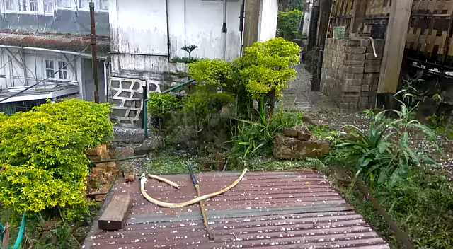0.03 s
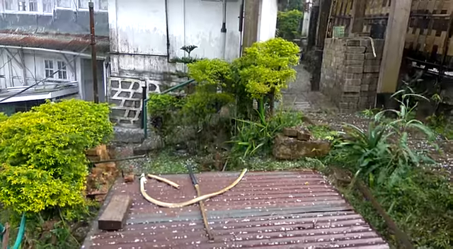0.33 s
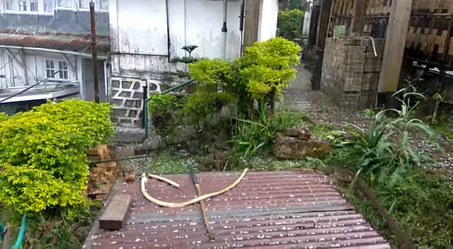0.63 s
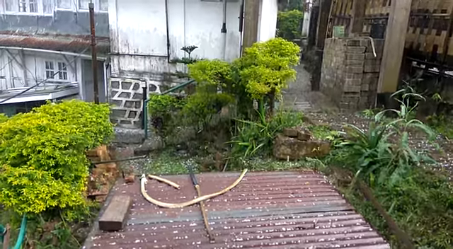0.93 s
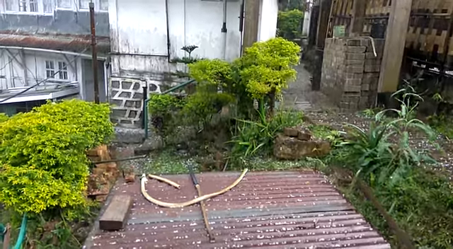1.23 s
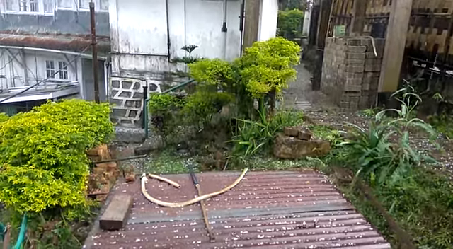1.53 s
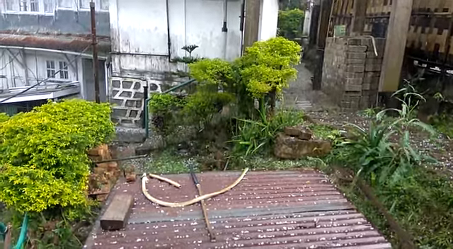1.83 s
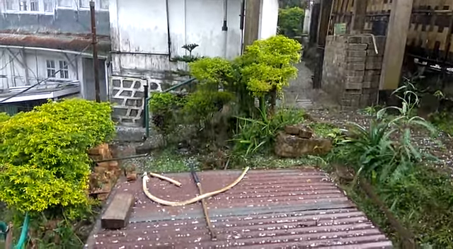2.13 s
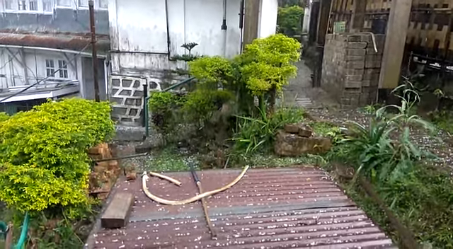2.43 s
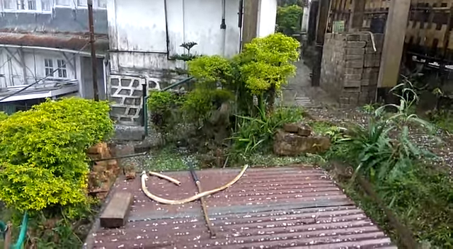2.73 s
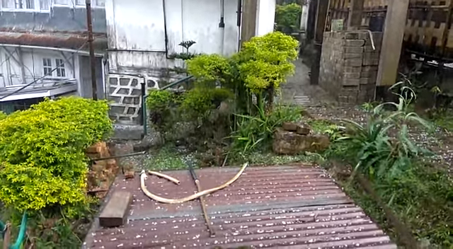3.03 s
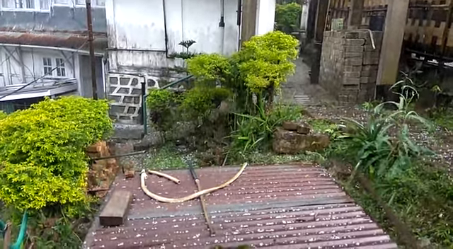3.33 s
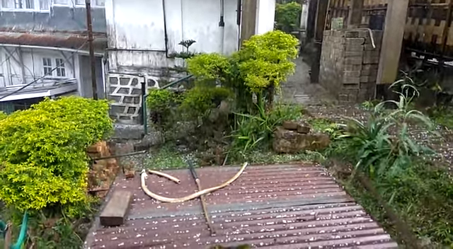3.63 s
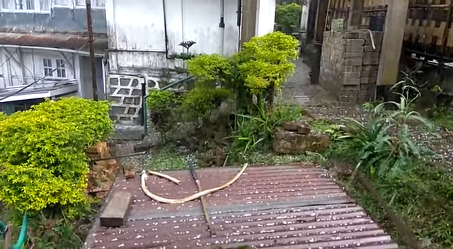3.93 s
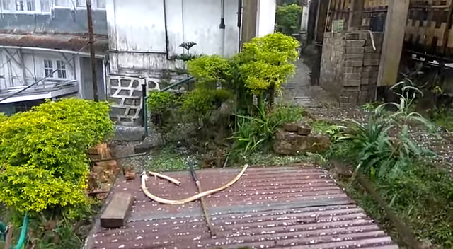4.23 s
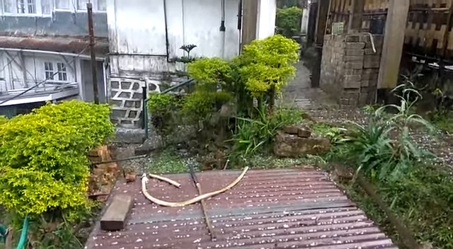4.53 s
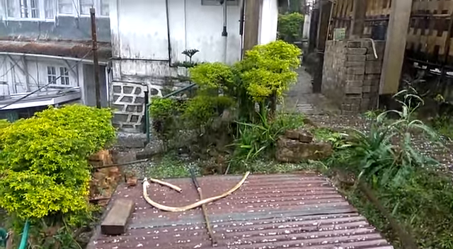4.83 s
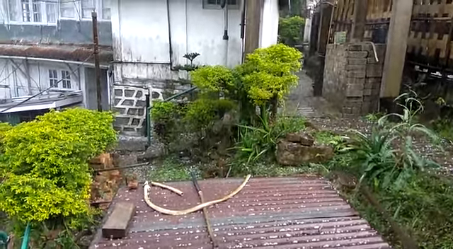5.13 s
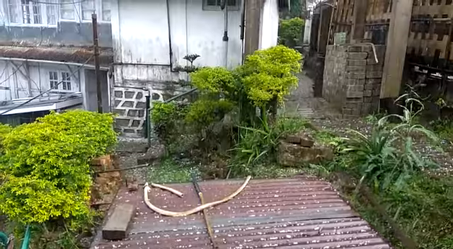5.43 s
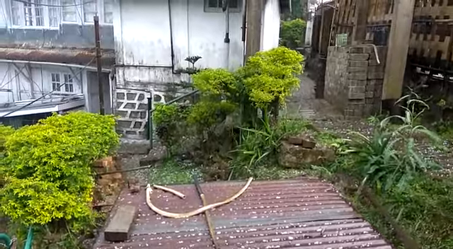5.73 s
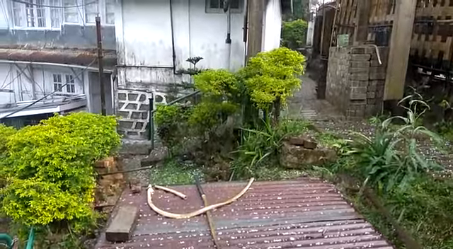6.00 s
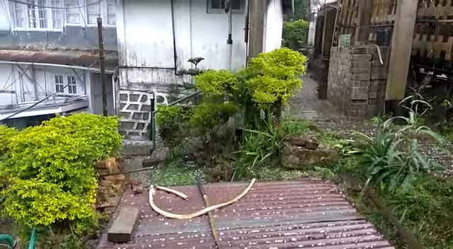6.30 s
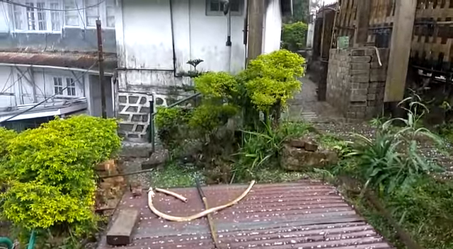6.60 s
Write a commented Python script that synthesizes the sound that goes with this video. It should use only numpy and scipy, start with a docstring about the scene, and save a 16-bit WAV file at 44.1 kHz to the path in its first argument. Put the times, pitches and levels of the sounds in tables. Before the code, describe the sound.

Hailstones and rain drum and rattle on metal roofing in a yard, with sharp close hits and occasional heavier knocks.

```python
"""After a brief silence, hail and rain fade in, beating steadily on corrugated metal roofing in a yard.
Countless impacts excite the modes of the sheets and merge into drumming and a bright rattle of ice.
Almost at once nearer stones begin to crack and skitter on the metal; then a few heavy ones thud.
The fall keeps on to the end, and its loudest peaks overload the microphone."""
import sys
import numpy as np
from scipy import signal
from scipy.fft import rfft, irfft, next_fast_len
from scipy.io import wavfile
from scipy.ndimage import map_coordinates

SR = 44100
rng = np.random.default_rng(int(sys.argv[2]) if len(sys.argv) > 2 else 0)


def store_pcm(level_fs):
    """Save levels as 16-bit WAV."""
    pcm = np.round(np.clip(level_fs, -1, 1) * 32767).astype(np.int16)
    wavfile.write(sys.argv[1], SR, np.atleast_2d(pcm).T)


N = 302526


def amp(db):
    """Amplitude ratio of a level in decibels."""
    return 10 ** (np.asarray(db) / 20)


def unit(x):
    """Normalisation to an rms of 1."""
    return x / np.sqrt(np.mean(x ** 2) + 1e-20)


def along(points, hz):
    """Interpolation of (f/Hz, value) points on a logarithmic frequency axis."""
    f, values = np.transpose(points)
    return np.interp(np.log(hz + 1), np.log(f + 1), values)


def filtered(x, response):
    """Linear filtering: the spectrum of x is multiplied by a frequency response."""
    size = next_fast_len(N + SR // 4)
    hz = np.fft.rfftfreq(size, 1 / SR)
    return irfft(rfft(x, size) * response(hz), size)[..., :N]


def coloured(x, spectrum):
    """Spectral shaping of a white signal at constant power."""
    return filtered(x, lambda hz: unit(amp(along(spectrum, hz))))


def decay(t, t60):
    """Exponential damping: 60 dB in t60 seconds."""
    return np.exp(-np.log(1000) * t / t60)


def add(track, start_s, sound):
    """Superposition of a sound on a stereo track."""
    part = track[:, round(start_s * SR):][:, :sound.shape[1]]
    part += sound[:, :part.shape[1]]


def wobble(per_second):
    """Smooth random modulation: a spline through Gaussian values."""
    return map_coordinates(rng.standard_normal(size=1024), [np.arange(N) * per_second / SR], mode="mirror")


def patter(per_second, spread_db, t60, contact_db):
    """Shot noise: random impacts each give a sharp contact and a dense ring; the rings add in energy."""
    landings = rng.random(N) < per_second / SR
    sizes = landings * amp(spread_db * np.minimum(rng.standard_normal(N), 2.2))
    energy = signal.fftconvolve(sizes ** 2, decay(np.arange(SR // 4) / SR, t60) ** 2)[:N]
    ring = unit(np.sqrt(np.abs(energy)) * rng.standard_normal((2, N)))
    # each contact has its own direction and so reaches the two microphone ports at different times
    arrivals = np.arange(N) + rng.integers(0, 20, size=(2, N))
    pushes = sizes * rng.choice([-1, 1], size=N)
    contacts = np.array([np.bincount(at, pushes)[:N] for at in arrivals])
    return unit(ring + amp(contact_db) * unit(contacts))


# slow drift in the strength of the fall: t/s, level/dB
FALL_DRIFT = [(0.85, -12), (0.91, -12.5), (1.06, -12.5), (1.46, -12.5), (1.76, -12.5), (2.31, -12),
              (5.09, -13), (5.51, -13), (6.48, -13), (6.8, -14)]
# brief lulls, when fewer stones land: t/s, change of level/dB
FALL_LULLS = [(1.64, -2), (2.63, -1.5), (3.35, -1), (3.92, -0.5), (4.42, -1.5), (4.87, -1.5), (5.14, -1.5),
              (5.82, -1), (6.38, -2)]


def fall_level():
    """Amplitude modulation by the strength of the fall, in dB: a slow drift with Gaussian dips."""
    t = np.arange(N) / SR
    half_lull_s = 0.035
    drift_db = np.interp(t, *np.transpose(FALL_DRIFT))
    return drift_db + sum(dip_db * np.exp(-((t - s) / half_lull_s) ** 2) for s, dip_db in FALL_LULLS)


# spectrum of whole sheets flexing: f/Hz, relative level/dB
SHEET_SPECTRUM = [(15, -35), (36, -24), (65, -5.5), (90, -7.5), (150, -6), (250, -3), (350, 0), (480, -5),
                  (700, -5), (1500, -34)]
# spectrum of the ribs of the sheets: f/Hz, relative level/dB
RIB_SPECTRUM = [(200, -43), (450, -6.5), (620, -6.5), (820, -0.5), (1350, 0), (2000, 2), (2900, -3.5),
                (4500, -15.5), (9000, -53)]


def drumming(fall_db):
    """Bending vibration of plates: under the mass of stones whole sheets boom and their ribs clatter."""
    boom = coloured(patter(per_second=900, spread_db=1.5, t60=0.22, contact_db=-3.5), SHEET_SPECTRUM)
    clatter = coloured(patter(per_second=1300, spread_db=4, t60=0.18, contact_db=-7.5), RIB_SPECTRUM)
    return amp(fall_db - 10) * boom + amp(fall_db - 0.63) * clatter


def sheet_notes(fall_db, count):
    """Free vibration of a single mode: some stones ring a sheet as one damped sinusoid."""
    t = np.arange(SR // 8) / SR
    notes = np.zeros((2, N))
    low_hz, high_hz, spread_db = 650, 2600, 7
    for when, height, size, direction in rng.random((count, 4)):
        hz = low_hz * (high_hz / low_hz) ** height
        note = amp(spread_db * size) * np.sin(2 * np.pi * hz * t) * decay(t, t60=0.11)
        angle = 2 * np.pi * direction
        add(notes, when * N / SR, np.outer([np.cos(angle), np.sin(angle)], note))
    return amp(fall_db - 13) * unit(notes)


# spectrum of metal struck by hard ice: f/Hz, relative level/dB
PING_SPECTRUM = [(1500, -26), (3000, -5.5), (3900, -4.5), (5000, 0.5), (6200, -2), (7800, -7.5),
                 (9300, -10.5), (11000, -16), (15000, -25.5)]
# spectrum of ice breaking: f/Hz, relative level/dB
CRACK_SPECTRUM = [(1500, -14), (4000, -31), (7000, 6), (9400, 3.5), (11500, -4), (15000, -12)]


def ice_rattle(fall_db):
    """Brief contact excites high modes: small stones ring the metal's treble, and some tick close by."""
    far = coloured(patter(per_second=1300, spread_db=8, t60=0.24, contact_db=-6), PING_SPECTRUM)
    ticks = coloured(patter(per_second=150, spread_db=6.5, t60=0.076, contact_db=-10), CRACK_SPECTRUM)
    flurry_db = 0.26 * wobble(per_second=9)
    far_db = 0.77 + flurry_db
    ticks_db = -13.5 + 1.6 * flurry_db  # in a flurry more ice splinters, so the ticks grow faster
    return amp(fall_db) * (amp(far_db) * far + amp(ticks_db) * ticks)


def impact(rise_s, t60):
    """Impulse response of dense modes: noise builds up as waves spread over the sheet, then decays."""
    t = np.arange(SR // 3) / SR
    envelope = (1 - np.exp(-(t / rise_s) ** 2)) * decay(t, t60)
    return envelope / envelope.max() * rng.standard_normal((2, len(t)))


def spot_colour(sound, depth_db, spacing_hz):
    """Selective excitation: each landing spot favours its own modes, a smooth random spectral ripple."""
    hz = np.fft.rfftfreq(sound.shape[1], 1 / SR)
    ripple = map_coordinates(rng.standard_normal(size=128), [hz / spacing_hz], mode="nearest")
    return irfft(rfft(sound) * unit(amp(depth_db * ripple)))


def stray_stones(count):
    """Random arrivals of lesser near stones, one per equal interval: t/s, crack level/dB, ping level/dB."""
    times = (np.arange(count) + rng.random(count)) / count * N / SR
    levels_db = rng.normal(loc=[-17.5, -20], scale=1, size=(count, 2))
    return np.column_stack([times, levels_db])


# the loudest near stones: t/s, level of the ice crack/dB, level of the metal ping/dB
NEAR_STRIKES = [(0.73, -22, -7), (0.817, -13, -22), (0.881, -19, -9.5), (0.973, -18, -9), (1.068, -17, -7),
                (1.132, -16, -14), (1.243, -14, -15), (1.475, -22, -9), (1.56, -18, -11), (1.685, -16, -16),
                (1.797, -14, -11), (2.108, -21, -11.5), (2.299, -15, -10), (2.395, -16, -7),
                (2.509, -14, -16), (2.671, -22, -18), (2.822, -19, -8), (2.998, -17, -27),
                (3.168, -14, -14), (3.205, -13, -9), (3.386, -14, -14), (3.585, -14, -11),
                (3.662, -10.5, -7.5), (3.825, -15, -20), (3.864, -19, -10), (4.010, -10.5, -18),
                (4.107, -12, -26), (4.137, -17, -9), (4.484, -18, -10), (4.596, -20, -12),
                (4.803, -15, -12.5), (4.911, -15, -10), (5.046, -14, -20), (5.305, -14, -10),
                (5.36, -22, -10), (5.428, -12.5, -8.5), (5.467, -15, -10), (5.635, -12, -9),
                (6.002, -15, -9), (6.21, -11, -21), (6.474, -13, -8), (6.76, -17, -8.5)]


def near_stones():
    """Brittle fracture: each near stone shatters with a crack and leaves a short ping in the sheet."""
    cracks, pings = np.zeros((2, 2, N))
    for start_s, crack_db, ping_db in [*NEAR_STRIKES, *stray_stones(count=20)]:
        crack = impact(rise_s=0.004, t60=0.1)
        ping = impact(rise_s=0.005, t60=0.13)
        add(cracks, start_s, amp(crack_db) * spot_colour(crack, depth_db=2, spacing_hz=920))
        add(pings, start_s, amp(ping_db) * spot_colour(ping, depth_db=3.5, spacing_hz=346))
    return coloured(cracks, CRACK_SPECTRUM) + coloured(pings, PING_SPECTRUM)


# blows of heavy stones: t/s, resonance of the struck panel f/Hz, level/dB
HEAVY_STRIKES = [(1.295, 754, -17.5), (1.694, 382, -21), (1.821, 368, -20), (2.51, 2540, -11),
                 (2.672, 1960, -17), (3.005, 350, -15), (3.042, 2530, -13.5), (3.295, 960, -15.5),
                 (3.75, 302, -20), (3.864, 1700, -12), (3.969, 1630, -9.5), (4.59, 1210, -9),
                 (5.013, 1730, -17), (5.36, 2300, -10), (6.001, 1620, -12)]


def heavy_stones():
    """Resonance: a big stone drives one panel in a band around its pitch; low panels ring longer."""
    thuds = np.zeros((2, N))
    width_octaves = 0.55
    for start_s, pitch_hz, db in HEAVY_STRIKES:
        burst = impact(rise_s=0.006, t60=0.13 * (1000 / pitch_hz) ** 0.17)
        hz = np.fft.rfftfreq(burst.shape[1], 1 / SR)
        resonance = np.exp(-(np.log2((hz + 1) / pitch_hz) / width_octaves) ** 2)
        skirt = 0.14 / (1 + (hz / 2500) ** 2)
        add(thuds, start_s, amp(db) * irfft(rfft(burst) * unit(resonance + skirt)))
    return thuds


# likeness of the sound at the two microphone ports: f/Hz, correlation coefficient
PORT_CORRELATION = [(30, 0.89), (100, 0.94), (340, 0.91), (680, 0.51), (1000, 0.72), (1400, 0.067),
                    (1900, -0.53), (2350, 0.39), (2800, -0.2), (4000, 0.013), (5100, 0.06), (6500, 0.037)]
# balance of the ports: f/Hz, left minus right level/dB
PORT_BALANCE = [(100, -1), (1400, 0.5), (2100, 1.5), (2900, 2), (4700, 0), (6000, -4.5), (8000, 0.5),
                (9700, -2), (12000, -0.2)]


def microphones(pair):
    """Spatial coherence: two close ports receive long waves alike and short waves each in their own way."""
    def mid_side_gains(hz):
        angle = np.arccos(np.clip(along(PORT_CORRELATION, hz), -1, 1)) / 2
        return np.array([np.cos(angle), np.sin(angle)])

    def left_right_gains(hz):
        return amp(np.outer([1, -1], along(PORT_BALANCE, hz)) / 2)

    mid, side = filtered(pair, mid_side_gains)
    return filtered(np.array([mid + side, mid - side]), left_right_gains)


def scene():
    """Superposition: single stones stand out from a wash that follows the strength of the fall."""
    fall_db = fall_level()
    wash = drumming(fall_db) + sheet_notes(fall_db, count=420) + ice_rattle(fall_db)
    return microphones(wash + near_stones() + heavy_stones())


def record(dry):
    """Saturation and band limiting: after a fade-in, peaks are rounded off and the top treble is cut."""
    start_s, fade_from_db, fade_tau_s = 0.576, -22, 0.097
    ceiling, hardness, cutoff_hz = 1.03, 5.5, 15600
    elapsed = np.maximum(np.arange(N) / SR - start_s, 0)
    faded = dry * (elapsed > 0) * amp(fade_from_db * np.exp(-elapsed / fade_tau_s))
    clipped = faded / (1 + np.abs(faded / ceiling) ** hardness) ** (1 / hardness)
    low_pass = signal.ellip(10, 0.1, 70, cutoff_hz, fs=SR, output="sos")
    return signal.sosfilt(low_pass, clipped)


dry = scene()
out = record(dry)
store_pcm(out)
```